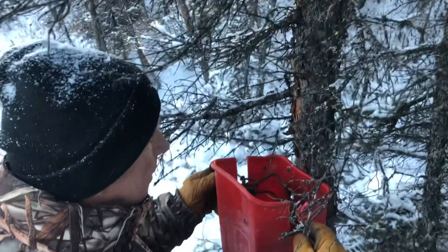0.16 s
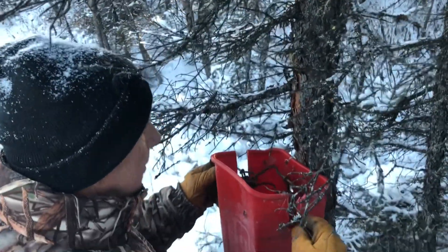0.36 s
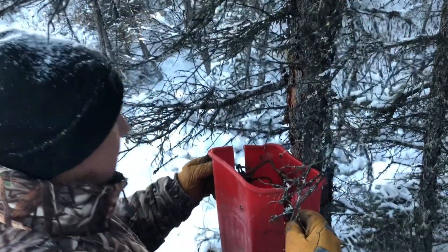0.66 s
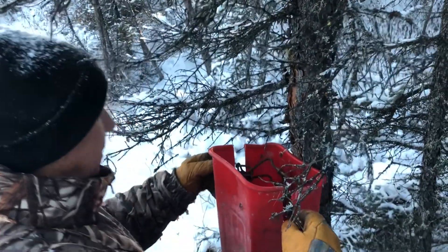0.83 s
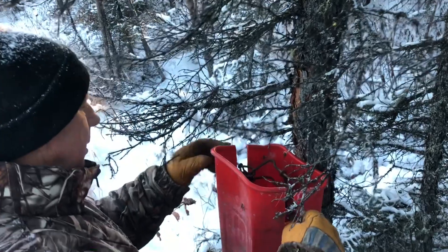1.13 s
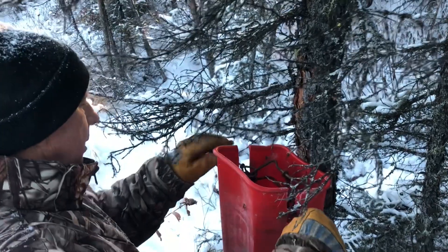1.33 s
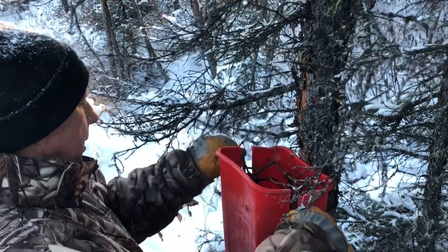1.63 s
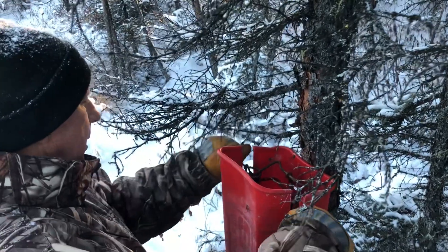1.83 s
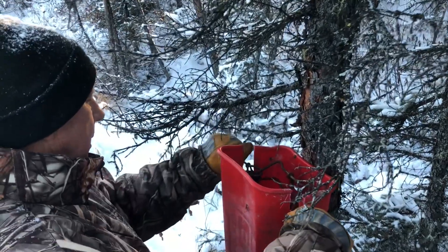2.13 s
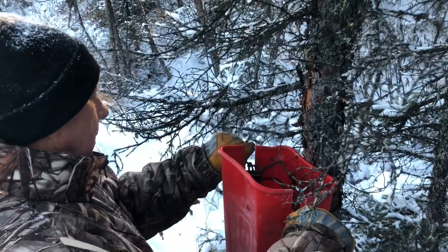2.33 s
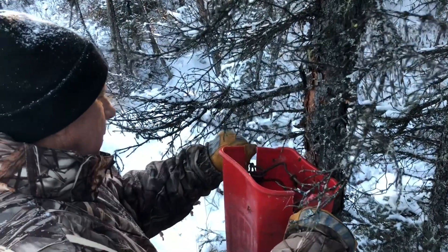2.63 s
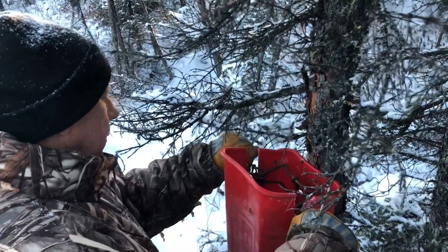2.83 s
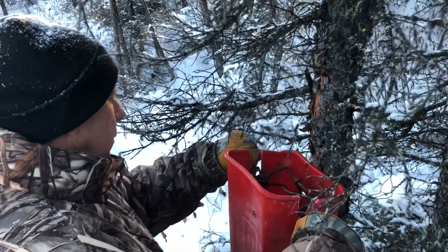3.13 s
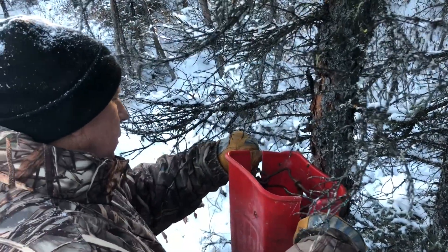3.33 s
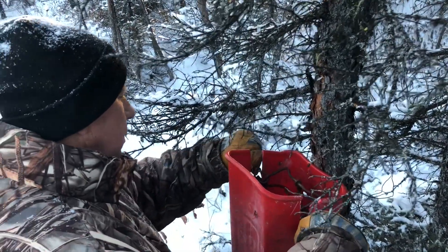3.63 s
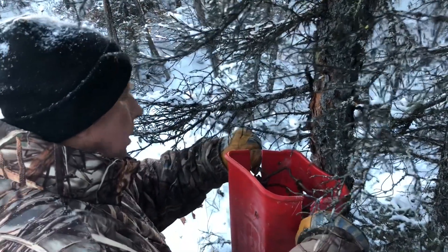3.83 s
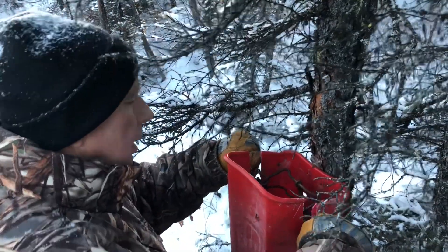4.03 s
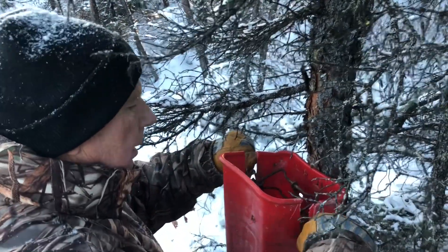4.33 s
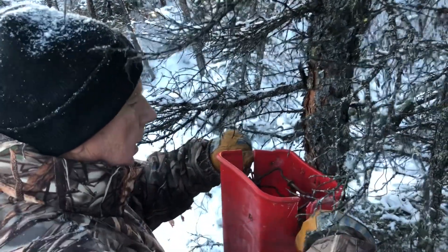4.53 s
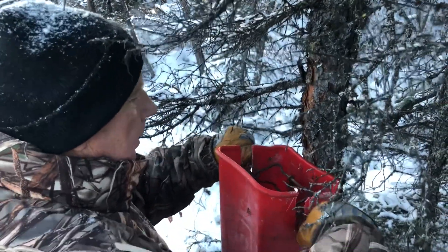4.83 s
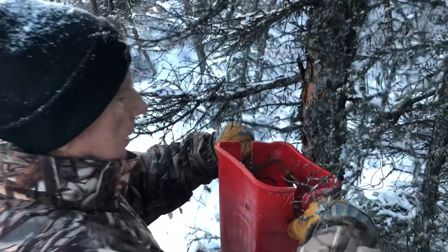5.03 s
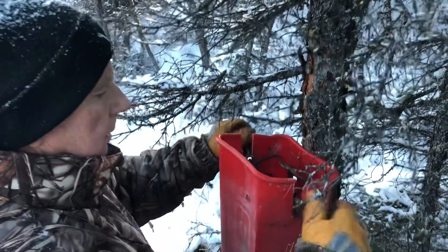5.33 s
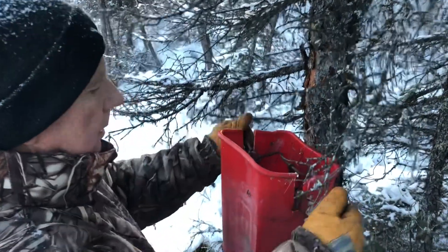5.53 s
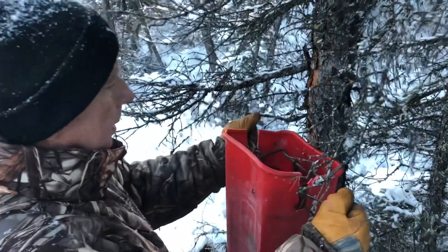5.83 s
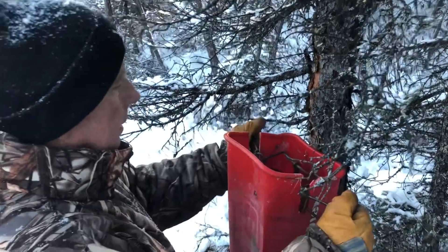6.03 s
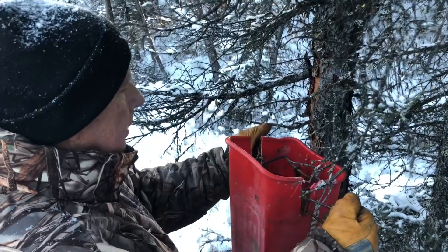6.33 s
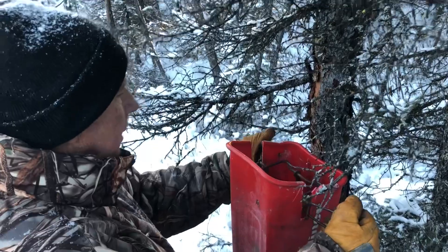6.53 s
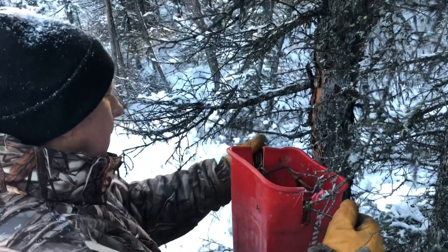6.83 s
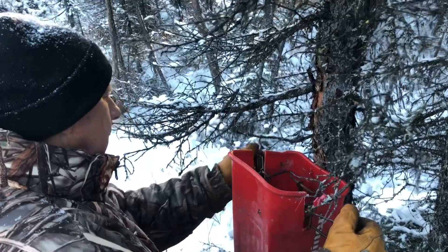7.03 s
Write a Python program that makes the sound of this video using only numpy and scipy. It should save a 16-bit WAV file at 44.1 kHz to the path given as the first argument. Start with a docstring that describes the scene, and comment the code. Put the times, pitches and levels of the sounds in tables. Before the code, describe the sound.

Close, echo-free handling sounds over a faint steady hiss: soft jacket and glove rustle, light wire clicks and a twig crack, then bursts of dull plastic knocking with metal scraping. Loose steel rings in very thin, short glassy tones. The rattling thickens after four seconds, gets a sharp bright clack, then heavier hollow bumps, and settles to almost nothing.

```python
"""In a snowy wood, a gloved hand wiggles a steel trap and its chain inside a plastic box tied to a tree.
Cloth noise rustles over a steady hiss. Steel knocks and scrapes: rough noise makes the box modes ring.
Chain and wire tick as short noise cracks with brief ringing, and a dry twig snaps as one short pulse.
Free steel parts ring as thin, pure tones that die quickly once they are touched."""
import sys
import numpy as np
from scipy import signal
from scipy.fft import rfft, irfft
from scipy.io import wavfile
from scipy.ndimage import uniform_filter1d

SR = 44100
rng = np.random.default_rng(int(sys.argv[2]) if len(sys.argv) > 2 else 0)


def int16_out(signal):
    """Quantize to a 16-bit WAV file."""
    q = np.round(np.clip(np.atleast_2d(signal).T, -1, 1) * 32767)
    wavfile.write(sys.argv[1], SR, q.astype(np.int16))


N = 316814  # length in samples

# All levels and spectra below are those before the microphone colour.
# sleeves and gloves: (t/s, level/dB)
RUSTLE_LEVEL = [(0, -79.5), (.3, -75.5), (1.1, -74), (1.3, -66.5), (1.55, -65), (1.72, -68), (1.95, -79.5),
                (3.15, -78.5), (3.5, -74.5), (4.05, -74.5), (4.45, -65), (4.95, -70), (5.25, -58.5),
                (5.5, -65.5), (5.85, -72), (6.2, -63), (6.55, -70.5), (7.18, -80)]
# spectrum of cloth noise: (f/Hz, level/dB)
CLOTH_SPECTRUM = [(120, -14), (200, -10), (434, 1), (476, 0.5), (594, 0), (1030, -3), (15000, -25.5),
                  (16500, -13.5)]
# one quick sweep of a sleeve: (t/s, half-length/s, extra level/dB, extra brightness/dB per octave)
SLEEVE_SWEEP = (.25, 0.031, 17.4, 7.9)
CALM_DB, BRIGHT_PER_DB = -75.5, 0.1339  # cloth gains this many dB per octave for each dB above calm
# spectrum of the hiss: (f/Hz, level/dB)
HISS_SPECTRUM = [(18, -26), (30, -2), (150, 6), (332, 0.5), (399, -7), (533, -7.5), (2530, -22.5),
                 (15200, -22.5), (16500, -28)]
HISS_DB = -69

# steel on the box: (t/s, wall level/dB, contact/s, hardness = upper modes over the wall level/dB)
KNOCKS = [(0.031, -69.5, 0.0063, 5.5), (0.187, -64, 0.0067, 0), (0.576, -59, 0.0073, 5),
          (0.724, -51, 0.0016, -12), (1.739, -58.5, 0.0037, 4.5), (2.214, -39.5, 0.01, -7),
          (2.242, -41.5, 0.006, 1.5), (2.258, -37, 0.0063, -11.5), (2.276, -54.5, .0054, -0.5),
          (2.465, -40, 0.0086, -3), (2.626, -60, 0.0019, -8), (2.732, -40.5, 0.006, -7.5),
          (2.863, -39.5, 0.016, 1), (2.88, -44, 0.01, -3), (3.205, -49, 0.0042, 2),
          (3.218, -35.5, 0.011, 0), (3.26, -61, 0.026, 3), (3.353, -40.5, 0.016, 1.5),
          (3.449, -46, 0.0039, -2.5), (3.485, -42.5, 0.015, 0), (3.578, -38, 0.0034, 1),
          (3.832, -62.5, 0.029, -6.5), (4.111, -54, 0.0069, -4), (4.198, -41, .012, -4),
          (4.264, -46.5, 0.0052, 0), (4.318, -38.5, 0.015, -4.5), (4.405, -62, 0.0095, 6.5),
          (4.439, -55, 0.026, -1), (4.544, -43.5, 0.012, 3), (4.576, -36.5, 0.024, 1.5),
          (4.654, -52, 0.0041, -9), (4.686, -49, 0.0068, 0), (4.702, -41.5, 0.031, 1),
          (4.757, -41.5, 0.0095, 1), (4.793, -53.5, .0051, 1.5), (4.834, -44, 0.021, -0.5),
          (4.848, -44.5, 0.016, 1), (4.987, -48.5, 0.0036, -4), (5.013, -50.5, 0.01, -0.5),
          (5.102, -66, .026, 12.5), (5.232, -54.5, 0.021, -7), (5.285, -67.5, 0.021, 24),
          (5.337, -57.5, 0.017, 5), (5.443, -50, 0.011, -4), (5.489, -44, 0.0044, -3),
          (5.61, -53, .0056, -1.5), (5.696, -56.5, 0.021, 0.5), (5.79, -46, 0.021, -14.5),
          (5.918, -33.5, 0.0053, -1), (5.929, -28.5, 0.061, -7.5), (6.087, -34.5, 0.024, -5.5),
          (6.135, -37.5, 0.032, -7), (6.157, -34, 0.0049, -12), (6.178, -46, 0.038, -17),
          (6.215, -32.5, 0.039, -10), (6.271, -37, 0.0077, -2), (6.335, -38, 0.014, -8.5),
          (6.357, -30.5, 0.053, -3.5), (6.456, -56, .0055, 7.5), (6.508, -60, 0.018, -2.5),
          (6.628, -34, 0.0051, -2.5), (6.669, -34.5, 0.03, -8), (6.918, -58.5, 0.013, -7.5)]
# boom of the air in the box: (f/Hz, level/dB, time to fall 60 dB/s)
CAVITY_MODES = [(125, 10.5, 0.14)]
# low modes of the box wall: (f/Hz, level/dB, time to fall 60 dB/s)
WALL_MODES = [(213.6, -4.5, 0.064), (250, 3, 0.08), (320.8, 2, 0.066), (367, -10, 0.036),
              (591.4, -3.5, 0.081), (616.7, 2, 0.03)]
# upper modes of the box wall: (f/Hz, level/dB, time to fall 60 dB/s)
UPPER_MODES = [(721, -3.5, 0.041), (849.4, 2, 0.032), (981.5, -1, 0.023), (1106.4, -3, 0.048),
               (1250, 1.5, 0.019), (1426, -1, 0.023), (1666, -3, 0.022), (1862, -6, 0.011),
               (2075, -8.5, 0.029), (2400, -19.5, 0.028)]
# boom over the wall level as time goes on: (t/s, level/dB)
BOOM_LEVEL = [(2.2, -21.5), (2.5, -17.5), (3.3, -22.5), (3.6, -7), (4.3, -9), (4.6, -12.5), (4.85, -6.5),
              (5, -27), (5.9, -12.5), (6.1, -22), (6.35, -14), (6.6, -27), (6.9, -3)]
# lift of the two lowest wall modes against the other low ones: (t/s, level/dB)
DEEP_LIFT = [(.7, 2), (2.25, 5), (2.8, -1.5), (3.5, 3), (4.6, 0.5), (5.2, -7.5), (6, -6.5), (6.7, -7.5)]
# treble spectrum of steel contact, before it is tilted: (f/Hz, level/dB)
GRIT_SPECTRUM = [(1410, -3.5), (2400, -4), (2820, -0.5), (3890, 0), (4430, -0.5), (5250, -3), (9310, -7.5),
                 (11800, -10.5), (13100, -6), (16100, -12), (16500, -42)]
GRIT_DB, GRIT_PER_HARD = -9, 1  # grit over the wall level, and dB more per dB of hardness

# chain and wire ticks, plus one crisp tick of the sleeve sweep at 0.247 s: (t/s, level near the peak/dB,
# brightness/dB per octave)
TICKS = [(0.5751, -40.5, -6.5), (.247, -48, 12), (0.747, -49, -9.5), (0.798, -58, -1), (1.4245, -43.5, 4),
         (1.478, -52, 4), (1.504, -46, 5), (1.532, -49, 6), (1.7381, -38, 1), (2.2183, -35.5, -1.5),
         (2.2422, -38, 4), (2.2761, -37, 1.5), (2.466, -35.5, -2.5), (2.5155, -44, -1), (2.658, -53, 5.5),
         (2.815, -35.5, 18), (2.8647, -41, 9), (2.907, -40.5, -1.5), (3.2216, -43, 6), (3.26, -41, 1),
         (3.352, -47, -15), (3.406, -42.5, -7), (3.4501, -38, -4), (3.5797, -35.5, 1),
         (3.5871, -32.5, -4.5), (3.705, -42.5, -6), (4.2091, -37, 2), (4.262, -42, -6), (4.3341, -37, 2),
         (4.4133, -35.5, -2.5), (4.4378, -36.5, 0.5), (4.489, -47, 4), (4.527, -48, 4), (4.578, -29.5, 0),
         (4.634, -44, -1), (4.651, -34, -4), (4.6855, -38, -3), (4.7023, -30, 4.5), (4.8491, -31, -3),
         (4.9587, -37.5, -9.5), (4.982, -46, -9), (5.1034, -40.5, 3.5), (5.1695, -34, 7), (5.222, -52, 2),
         (5.253, -39.5, 4), (5.2705, -34, 14), (5.2845, -19.5, 3), (5.3364, -35, -3), (5.367, -42, -6),
         (5.441, -33, -2.5), (5.55, -40, -7.5), (5.61, -33.5, 4.5), (5.6788, -39, 0.5), (5.6949, -45.5, 0),
         (5.8614, -48, 17), (5.9177, -27.5, 6.5), (5.9935, -32, 2), (6.034, -47.5, 3.5),
         (6.0773, -36.5, -0.5), (6.1964, -34, 7), (6.227, -32, -0.5), (6.2731, -22.5, 8),
         (6.3121, -40.5, 4), (6.3716, -25.5, 2.5), (6.6269, -28, -9.5)]
# short wire modes rung by each tick: (f/Hz, level/dB, time to fall 60 dB/s)
WIRE_MODES = [(4210, -12, 0.076), (7628, -16.5, 0.15), (8340, -25.5, 0.14), (9670, -11, 0.059)]
# a dry twig breaks: (t/s, level/dB, modes as (f/Hz, level/dB, time to fall 60 dB/s))
TWIG = (1.5622, -29.5, [(1890, -2.5, 0.0042), (3260, -0.5, 0.0042), (6500, 1.5, 0.0013)])

# pitches of each free steel part: (f/Hz, ...)
PART_HZ = {"ring": [13119, 13692], "link": [13222, 8320], "hook": [13823], "pin": [6040], "rod": [7628],
           "clip": [3050, 5200]}
# modes of each part, in the same order: (level/dB, time to fall 60 dB/s while free)
PART_MODES = {"ring": [(0, 0.27), (1.5, 0.34)], "link": [(0, 0.51), (-11, .13)], "hook": [(0, 0.69)],
              "pin": [(0, 0.34)], "rod": [(0, 0.47)], "clip": [(0.44, 0.082), (-2.2, 0.1)]}
# strikes on the free parts: (t/s, part, level/dB, time until touched/s)
STRIKES = [(1.737, "rod", -68, 0.026), (2.217, "ring", -46.5, 0.083), (2.217, "rod", -56, .064),
           (2.276, "ring", -52, 0.08), (2.275, "rod", -59, 0.027), (2.466, "ring", -60, .09),
           (1.737, "link", -72, 0.036), (2.907, "ring", -51.5, .2), (3.26, "ring", -59.5, .11),
           (3.355, "ring", -57, .14), (3.355, "rod", -59.5, 0.084), (3.45, "rod", -53.5, 0.082),
           (3.585, "hook", -60, .075), (3.58, "pin", -60.5, .19), (4.208, "pin", -62, .12),
           (4.32, "pin", -57, .2), (5.167, "pin", -59, 0.034), (3.587, "link", -47.5, .4),
           (3.704, "rod", -62.5, 0.099), (4.208, "hook", -59, .25), (4.208, "rod", -58.5, .14),
           (4.32, "link", -47, .28), (4.32, "rod", -47, .19), (4.415, "rod", -47, 0.084),
           (4.651, "rod", -48.5, 0.044), (4.702, "ring", -42, .21), (4.702, "hook", -50, .14),
           (4.702, "rod", -45.5, 0.11), (4.72, "link", -58, 0.19), (4.85, "link", -59, 0.11),
           (4.85, "hook", -52, 0.048), (4.85, "rod", -48, 0.031), (5.167, "link", -46.5, 0.074),
           (5.167, "rod", -47, 0.041), (5.168, "clip", -47.5, .035), (5.284, "link", -42.5, 0.049),
           (5.284, "rod", -37.5, 0.052), (5.284, "clip", -52, .03), (5.338, "link", -44.5, 0.089),
           (5.695, "clip", -58, 0.0099), (5.92, "ring", -50, .16), (5.92, "rod", -60, 0.11),
           (6.09, "ring", -60, .16), (6.272, "ring", -35.5, .026), (6.272, "link", -40.5, .4),
           (6.272, "hook", -50, .4), (6.272, "rod", -55, 0.036), (6.36, "ring", -45, 0.03)]
DAMPED_T60_S = 0.093  # the extra fall after a touch takes this long to reach 60 dB

# microphone colour: (f/Hz, level/dB)
MIC_COLOUR = [(2100, 0.5), (2700, -7.5), (3400, 1.5), (11000, -1), (12000, -1.5), (13000, 1), (15700, -3.5),
              (16000, -15)]
EDGE_HZ = 16600  # top of the microphone band


def amp(db):
    """Turns decibels into a gain."""
    return 10 ** (np.asarray(db) / 20)


def evened(x):
    """Scales a sound to an average strength (rms) of 1."""
    return x / np.sqrt(np.mean(x ** 2) + 1e-20)


def read(points, hz):
    """Reads a spectrum between its points, on a log-frequency axis."""
    f, value = np.transpose(points)
    return np.interp(np.log(hz + 1), np.log(f + 1), value)


def level_at(points, t):
    """Reads a level between its points in time."""
    return np.interp(t, *np.transpose(points))


def add(mix, s, sound):
    """Mixes a sound in at time s, in seconds."""
    part = mix[round(s * SR):][:len(sound)]
    part += sound[:len(part)]


def coloured(x, points, tilt_db=0):
    """Gives a sound a spectrum, tilted about 6 kHz by some dB per octave."""
    hz = np.fft.rfftfreq(len(x), 1 / SR)
    octaves = np.log2(np.maximum(hz, 1500) / 6000)  # no further tilt below 1500 Hz
    return irfft(rfft(x) * amp(read(points, hz) + tilt_db * octaves), len(x))


def ringing(modes, spread_db, detune, tilt_db=0, count=1):
    """Answer to a click: each mode is one or more close partners with random shares, as the struck place varies."""
    hz, db, t60 = np.repeat(modes, count, axis=0).T[:, :, None]
    t = np.arange(SR // 5) / SR
    share, shift = rng.standard_normal((2, *hz.shape))
    swell = np.minimum(t * hz / 2.46, 1)  # a mode takes a cycle or two to start moving
    level_db = db + tilt_db * np.log2(hz / hz[0]) + spread_db * share
    tones = np.sin(2 * np.pi * hz * (1 + detune * shift) * t)
    return (swell * amp(level_db - 60 * t / t60) * tones).sum(0)


def rustle():
    """Cloth friction: noise roughened by small grains, louder and brighter as the arms move."""
    # about 300 grains a second, each fading over about 1.3 ms
    grains = amp(4.6 * np.minimum(rng.exponential(1, N), 4)) * (rng.random(N) < 300 / SR)
    fading_grains = signal.lfilter([1], [1, -np.exp(-1 / (0.0013 * SR))], grains)
    rough = 0.5 + 0.22 * evened(fading_grains)
    cloth = coloured(rough * rng.standard_normal(N), CLOTH_SPECTRUM)

    # split into short slices, so that level and brightness can move with time
    hz, t, slices = signal.stft(cloth, SR, nperseg=512)
    treble_power = (abs(slices[hz > 2500]) ** 2).sum(0)
    slices = slices / np.sqrt(np.mean(treble_power))
    sweep_s, half_s, sweep_db, sweep_bright_db = SLEEVE_SWEEP
    level_db = level_at(RUSTLE_LEVEL, t)
    sweep = np.exp(-((t - sweep_s) / half_s) ** 2)
    bright_db = BRIGHT_PER_DB * (level_db - CALM_DB) + sweep_bright_db * sweep
    tilt_db = np.log2((hz[:, None] + 100) / 6000) * bright_db
    gain = amp(level_db + sweep_db * sweep + tilt_db)
    return signal.istft(slices * gain, SR, nperseg=512)[1][:N]


def hiss():
    """Steady random noise with a fixed spectrum and level."""
    return amp(HISS_DB) * evened(coloured(rng.standard_normal(N), HISS_SPECTRUM))


def knock(db, contact, upper_db, cavity_db, deep_db):
    """Steel lands on the wall and chatters while in contact; each set of modes then rings out."""
    t = np.arange(SR // 8) / SR
    let_go_db = 60 * np.maximum(t - 0.84 * contact, 0) / (0.058 + 0.5 * contact)
    press = np.minimum(t / 0.00049, 1) * amp(-let_go_db)
    blow = 1 + 3.5 * np.exp(-t / 0.0024)  # the first touch is the hardest
    jumps = amp(2.49 * rng.exponential(1, len(t)))
    chatter = rng.standard_normal(len(t)) * jumps * press * blow

    out = np.zeros(3 * SR // 8)
    wall = [(hz, mode_db + deep_db * (k < 2), t60) for k, (hz, mode_db, t60) in enumerate(WALL_MODES)]
    # modes, level over the wall level/dB, extra time used for levelling/s, detune as a share of pitch
    groups = ((wall, 0, 0.008, 0.04),
              (UPPER_MODES, upper_db, 0.008, 0.06),
              (CAVITY_MODES, cavity_db, 0.03, 0.01))
    for modes, level_db, settle, detune in groups:
        # softer blows favour low modes
        response = ringing(modes, 2.3, detune, 0.42 * upper_db, count=3)
        body = signal.fftconvolve(chatter, response)
        strength = np.std(body[:int((contact + settle) * SR)])
        add(out, 0, amp(db + level_db) * body / strength)

    # the scrape comes in uneven slips
    slips = amp(3.0 * evened(uniform_filter1d(rng.standard_normal(len(t)), size=90)))
    grit = evened(slips * coloured(rng.standard_normal(len(t)), GRIT_SPECTRUM, -1.7))
    add(out, 0, amp(db + GRIT_DB + GRIT_PER_HARD * upper_db) * press * grit)
    return out


def tick(db, bright_db):
    """Chain or wire taps: a sharp crack with a short noisy tail, and the wire ringing briefly."""
    t = np.arange(SR // 8) / SR
    noise = evened(coloured(rng.standard_normal(len(t)), GRIT_SPECTRUM, bright_db))
    tail_t60 = 0.063 * amp(-0.6 * bright_db)  # bright ticks are short
    crack = noise * (amp(-60 * t / 0.0058) + amp(-4.5 - 60 * t / tail_t60))
    # the wire rings less as the tick leans towards dull or bright
    wire = amp(-1.5 * abs(bright_db)) * ringing(WIRE_MODES, 2.2, 0.00056)[:len(t)]
    return amp(db - 7.5) * (crack + wire)


def twig_snap(db, modes):
    """A dry twig breaks: one short pulse of modes that hardly ring."""
    t = np.arange(SR // 50) / SR
    return sum(amp(db + mode_db - 60 * t / t60) * np.sin(2 * np.pi * hz * t) for hz, mode_db, t60 in modes)


def free_parts():
    """Each strike starts the thin tones of one part; they die slowly, then quickly once it is touched."""
    out = np.zeros(N)
    for s, part, db, free in STRIKES:
        t = np.arange(int((free + 0.05) * SR)) / SR
        touch_db = 60 * np.maximum(t - free, 0) / DAMPED_T60_S
        onset = np.minimum(t / 0.0014, 1)
        for hz, (mode_db, t60) in zip(PART_HZ[part], PART_MODES[part]):
            fall_db = 60 * t / t60 + touch_db
            tone = np.sin(2 * np.pi * (hz * t + rng.random()))
            add(out, s, amp(db + mode_db - fall_db) * onset * tone)
    return out


def scene():
    """Cloth, steel, box and twig close by, over the hiss."""
    near = rustle()
    for s, *row in KNOCKS:
        add(near, s, knock(*row, level_at(BOOM_LEVEL, s), level_at(DEEP_LIFT, s)))
    for s, *row in TICKS:
        add(near, s, tick(*row))
    snap_s, snap_db, snap_modes = TWIG
    add(near, snap_s, twig_snap(snap_db, snap_modes))
    near = near + free_parts()
    # things this small radiate no deep bass
    bass_cut = signal.butter(4, 90., "high", fs=SR, output="sos")
    return (signal.sosfilt(bass_cut, near) + hiss())[None]


def record(dry):
    """The microphone colours the sound, then limits its band at the top."""
    hz = np.linspace(0, SR / 2, 257)
    colour = signal.firwin2(255, hz, amp(read(MIC_COLOUR, hz)), fs=SR)
    band_limit = signal.firwin(255, EDGE_HZ, window=("kaiser", 9), fs=SR)
    return signal.oaconvolve(dry, np.convolve(colour, band_limit)[None], "same")


dry = scene()
out = record(dry)
int16_out(out)
```